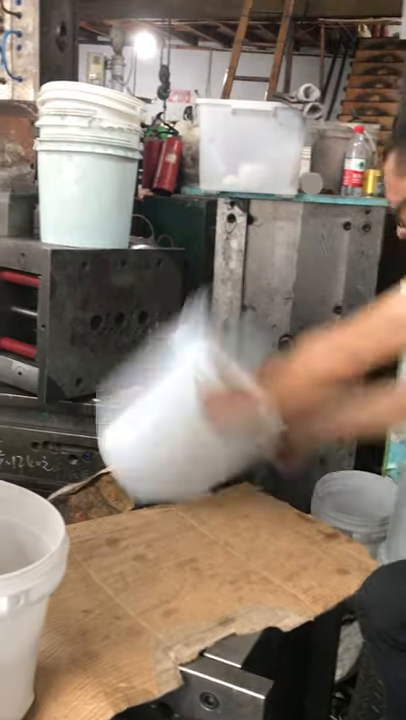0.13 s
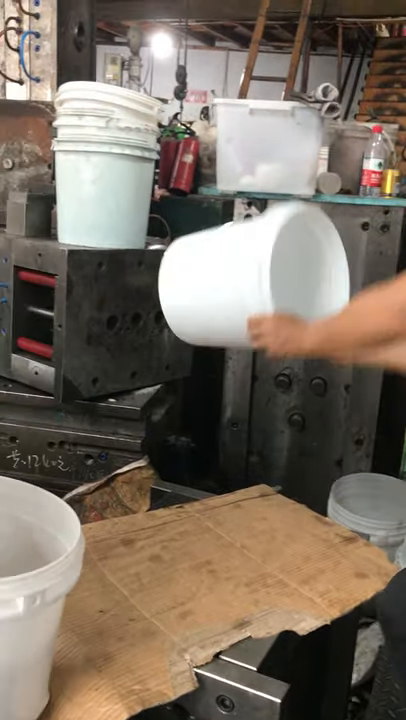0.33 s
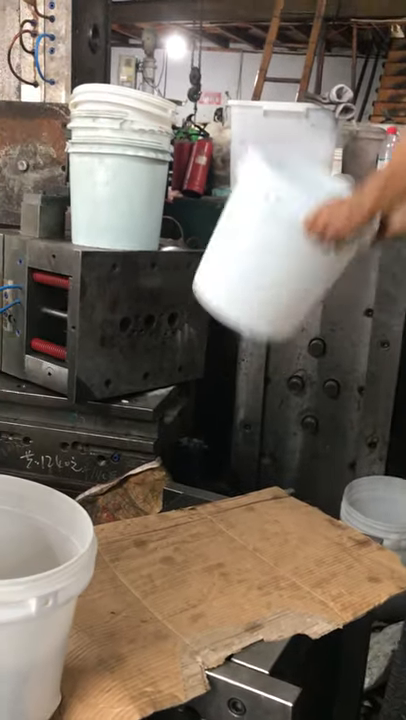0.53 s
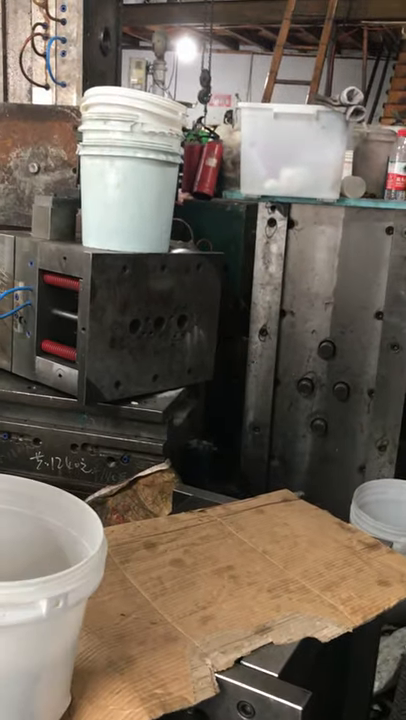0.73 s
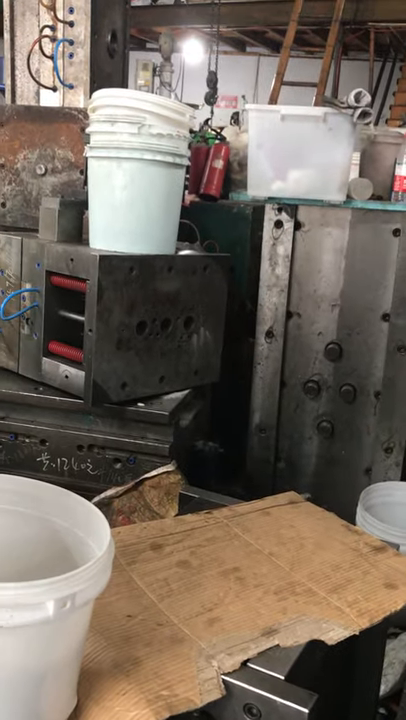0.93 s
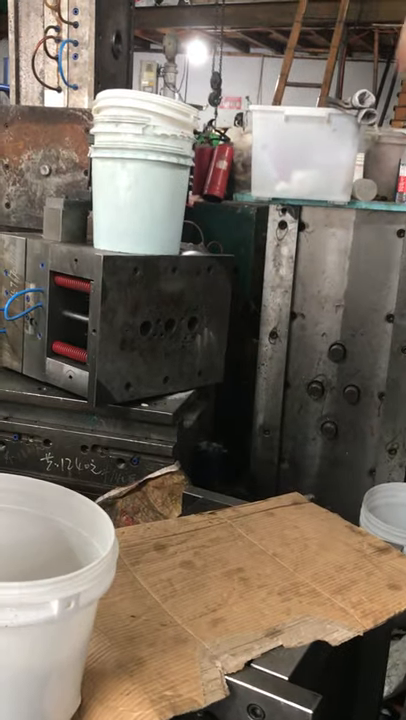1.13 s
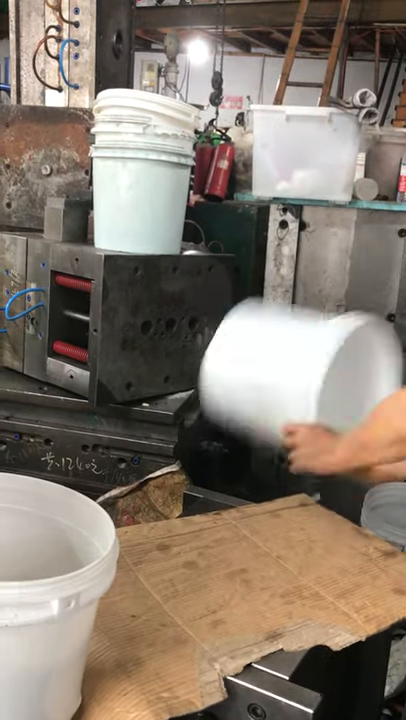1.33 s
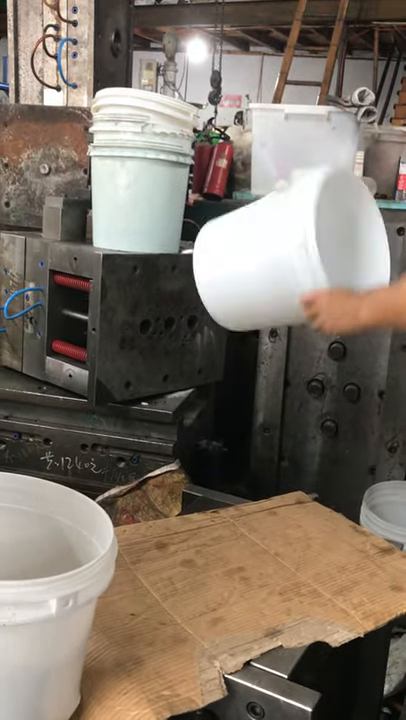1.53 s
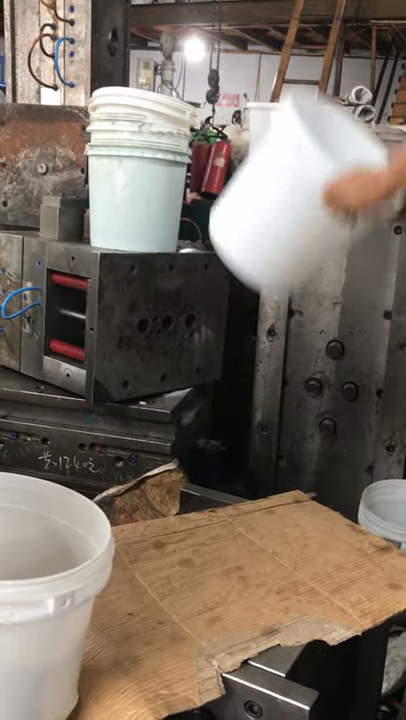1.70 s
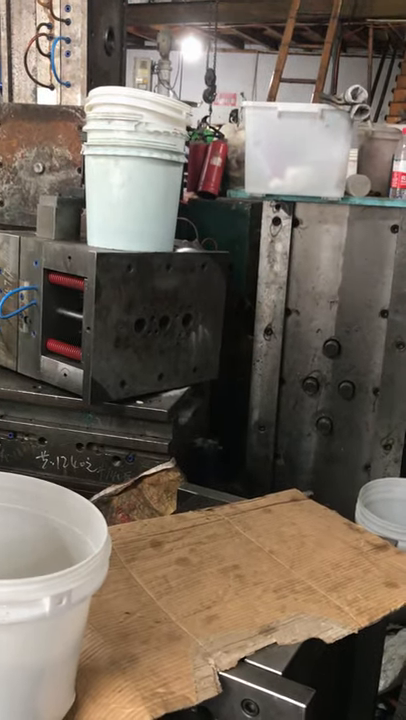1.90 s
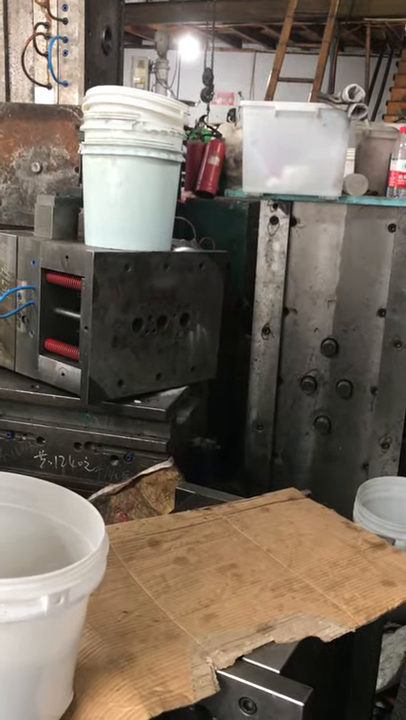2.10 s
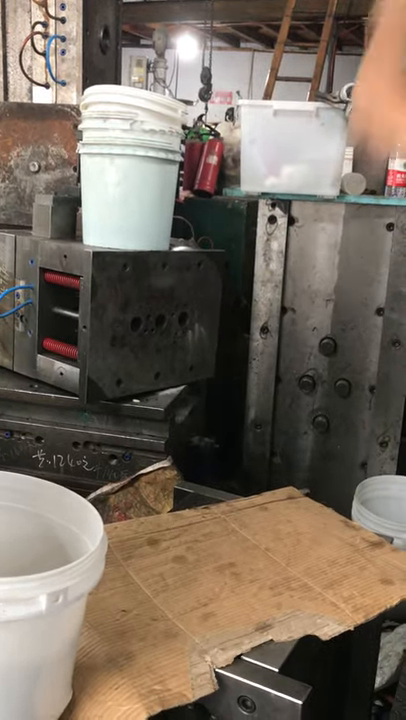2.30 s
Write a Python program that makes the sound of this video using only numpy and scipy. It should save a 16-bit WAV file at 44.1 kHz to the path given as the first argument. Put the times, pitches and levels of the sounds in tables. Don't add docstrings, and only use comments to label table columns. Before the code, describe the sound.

A hollow plastic bucket slams on a hard surface at 0.25 s, with a bright crack, short wall rattle, low boom and rebound at 0.3 s. A light handle tick and air puffs on the microphone lead to a second slam at 1.39 s, rebounding at 1.46 s. The large workshop echoes; motor hum and whine dip after each hit, then creep back, with faint metal clinks near 2.1 s.

```python
import sys
import numpy as np
from scipy import signal
from scipy.io import wavfile
from scipy.ndimage import uniform_filter1d, minimum_filter1d

SR = 44100
rng = np.random.default_rng(int(sys.argv[2]) if len(sys.argv) > 2 else 0)


def invert_db(level):
    return 10 ** (np.asarray(level, dtype=float) / 20)


def unload_wav(signal):
    wavfile.write(
        sys.argv[1],
        SR,
        np.round(np.clip(np.atleast_2d(signal).T, -1, 1) * 32767).astype(np.int16),
    )


N = 103635

# pitch_hz, level_db (per Hz)
WASH_SPECTRUM = [(15, -37), (25, 4.5), (263, -2), (293, 0.5), (427, -8), (575, -6), (1290, -12.5),
                 (4490, -24.5), (16000, -33.5)]
# pitch_hz, level_db, width_hz
MOTOR_TONES = [(134.3, -53.5, 4.3), (294.3, -36.5, 4), (591.5, -36, 37), (1000, -45.5, 8.2),
               (1447, -73, 2.7), (2154, -51.5, 12), (2400, -51, 180), (3133, -53, 62), (3623, -54, 16),
               (3886, -53.5, 12), (4370, -52.5, 19), (8200, -64, 11), (8900, -77, 40)]
# start_s, pitch_hz, level_db, t60_s (time to fade by 60 dB)
CLINKS = [(0.130, 6900, -40, .04), (0.608, 6250, -39, 0.086), (0.730, 2330, -34, 0.19),
          (1.280, 2276, -38.5, 0.55), (2.065, 8600, -41, .05), (2.120, 3440, -33.5, 0.11),
          (2.170, 3435, -37, 0.27), (2.215, 4900, -41, 0.08), (2.295, 3130, -39, 0.11)]
# middle_s, level_db, length_s
TICKS = [(0.032, -42, 0.0051), (0.136, -42, 0.0069), (1.086, -45, 0.014), (1.22, -45, .005),
         (1.331, -40, 0.0039), (2.050, -48, .004)]
# middle_s, level_db, pitch_hz, length_s
PUFFS = [(1.268, -22, 70, .009), (1.297, -17, 85, .011), (1.296, -24, 330, .006), (1.312, -25, 60, .01),
         (1.331, -18, 150, .009), (1.365, -29, 120, .015), (0.240, -28, 300, .008)]
# start_s, duck_db (how far the microphone gain drops)
SLAMS = [
    (0.2492, -11.5),
    (1.389, -12),
]
# pitch_hz, level_db (per Hz)
HALL_SPECTRUM = [(24, -55), (40, -34), (140, -5.5), (243, -26), (392, -14.5), (790, -13), (1210, -19),
                 (8340, -41), (16000, -46.5)]
# pitch_hz, t60_s
EARLY_FADE = [(60, 0.17), (240, 0.51), (1000, 0.37), (4000, 0.21), (12000, 0.33)]
LATE_FADE = [(60, 0.32), (240, 0.56), (600, 1.3), (1100, 2.66), (1600, 1.7), (4000, 0.95), (12000, 0.59)]
# start_s, level_db, attack_s, hold_s, pitch_hz
BOOMS = [
    (0.25, 3, 0.021, 0.015, 230.6),
    (0.29, 5, 0.014, 0.022, 243),
    (1.395, 4.5, 0.023, 0.013, 235.5),
    (1.455, 0.5, .005, .004, 240),
    (1.464, 5, 0.011, 0.0089, 238.2),
]
# start_s, level_db, softness_cut_hz, low_modes_extra_db
CONTACTS = [
    (0.2473, 4, 2460, -16),
    (0.2970, -3.5, 990, -18),
    (0.3330, -19, 1500, -6),
    (1.3840, -22.5, 450, 10),
    (1.3894, 4, 2570, 2.5),
    (1.4560, -6.5, 900, 1.5),
]
WALL_PITCHES = [355, 420, 490, 555, 630, 697, 790, 945, 1062, 1260, 1500, 1780, 1900, 2500]
# level_db, t60_s
WALL_MODES = [(-8, 0.075), (-8, 0.13), (-2, 0.22), (-15, 0.22), (-21.5, 0.2), (-9, 0.13), (-31, 0.28),
              (-10.5, 0.097), (-12.5, .13), (-15, 0.063), (3.5, 0.019), (-3, 0.017), (-17, 0.1), (-3, .05)]
# pitch_hz, level_db, t60_s
RIM_MODES = [(2700, -13, .004), (3900, -8, .004), (5600, -2, .0025), (7000, -7, .002), (8400, -3, .002),
             (11500, -9, .001), (13800, -4, .001)]
# start_s, level_db
SNAPS = [(0.24715, 12), (0.25015, 8), (0.2597, -8), (1.38990, 9), (1.39035, 9), (1.39265, 8), (1.3990, -11)]


def rms_one(x):
    return x / np.sqrt(np.mean(x ** 2) + 1e-20)


def at_hz(points, hz):
    pitch, value = np.array(points).T
    return np.interp(np.log(hz), np.log(pitch), value)


def since(s):
    return np.maximum(np.arange(N) / SR - s, 0)


def dying(s, t60):
    return (since(s) > 0) * invert_db(-60 * since(s) / t60)


def drift(rate_hz):
    r = np.exp(-2 * np.pi * rate_hz * 40 / SR)
    chance = rng.standard_normal(N // 40 + 2002)
    slow = signal.lfilter([1], [1, -2 * r, r * r], chance)[2000:]
    return np.interp(np.arange(N) / 40, np.arange(len(slow)), rms_one(slow - slow.mean()))


def ring(push, hz, t60):
    r, w = invert_db(-60 / (t60 * SR)), 2 * np.pi * hz / SR
    return signal.lfilter([0, np.sin(w)], [1, -2 * r * np.cos(w), r * r], push + 1e-18)


def narrow_noise(hz, width_hz):
    return rms_one(ring(rng.standard_normal(N), hz, np.log(1000) / (np.pi * width_hz)))


def high_passed(x, order, cut_hz):
    return signal.sosfilt(signal.butter(order, cut_hz, "high", fs=SR, output="sos"), x)


def bands(spectrum):
    edges = 25 * 2 ** np.arange(0, 9.5, 1 / 3)
    middles = np.sqrt(edges[1:] * edges[:-1])
    white = rng.standard_normal((2, N))
    parts = []
    for k, hz in enumerate(middles):
        band = signal.butter(2, edges[k:k + 2], "band", fs=SR, output="sos")
        parts.append(invert_db(at_hz(spectrum, hz)) * signal.sosfilt(band, white[k % 2]))
    parts = np.array(parts)
    return zip(middles, parts / np.sqrt(np.mean(parts.sum(0) ** 2)))


def click(s, db):
    return invert_db(db) * (np.arange(N) == int(s * SR))


def machinery():
    lumps = drift(5)
    wash = 0
    for hz, noise in bands(WASH_SPECTRUM):
        patchy_db = (hz < 3000) * 2.6 * drift(3.3)
        lumpy_db = (hz < 200) * 1.6 * lumps
        wash = wash + noise * invert_db(patchy_db + lumpy_db)
    tones = 0
    for hz, db, width_hz in MOTOR_TONES:
        tones = tones + invert_db(db + 1.2 * drift(3.8)) * narrow_noise(hz, width_hz)
    return invert_db(-31) * wash + tones


def clinks():
    out = 0
    for s, hz, db, t60 in CLINKS:
        fade = uniform_filter1d(np.abs(dying(s, t60)), size=120)
        out = out + fade * invert_db(db) * np.sin(2 * np.pi * hz * since(s))
    return out


def ticks():
    bright = high_passed(rng.standard_normal(N), 2, 5000)
    t = np.arange(N) / SR
    return bright * sum(invert_db(db) * np.exp(-((t - s) / length) ** 2) for s, db, length in TICKS)


def puffs():
    rough = narrow_noise(210, 370)
    out = 0
    for s, db, hz, length in PUFFS:
        t = np.arange(N) / SR - s
        shape = invert_db(db) * np.exp(-(t / length) ** 2)
        out = out + shape * (0.23 * rough + np.sin(2 * np.pi * hz * t * (1 - 35 * t)))
    return out


def hall():
    def after_slams(t60):
        return sum(dying(s + 0.00067, t60) for s, _ in SLAMS)

    def swell(t60):
        return 1 - sum(dying(s, t60) for s, _ in SLAMS)

    echo = 0
    for hz, noise in bands(HALL_SPECTRUM):
        early = invert_db(-6 * (150 < hz < 320)) * after_slams(at_hz(EARLY_FADE, hz))
        late = invert_db(-11) * after_slams(at_hz(LATE_FADE, hz))
        echo = echo + noise * (early + late)
    echo = invert_db(-9) * swell(0.013) * echo

    steel = invert_db(-27) * after_slams(1.65) * narrow_noise(1102, 62)

    boom_hz, width_hz = 240, 29
    tail = narrow_noise(boom_hz, width_hz)
    tail = tail + invert_db(-4) * np.sin(2 * np.pi * boom_hz * np.arange(N) / SR)
    tail = tail + 0.67 * narrow_noise(1.16 * boom_hz, width_hz)
    tail = invert_db(-16.5) * swell(0.096) * after_slams(1.725) * tail
    return steel + echo + tail


def booms():
    release_s, glide = 0.0062, -0.18
    out = 0
    for s, db, attack, hold, hz in BOOMS:
        t = since(s)
        rise = np.sin(np.pi / 2 * np.minimum(t / attack, 1)) ** 2
        choke = np.exp(-since(s + attack + hold) / release_s)
        out = out + invert_db(db) * rise * choke * np.sin(2 * np.pi * hz * (t + glide * t * t))
    return out


def walls():
    chance_db = rng.normal(0, 1.1, (len(CONTACTS), len(WALL_MODES)))
    out = 0
    for (s, db, cut_hz, low_db), own_db in zip(CONTACTS, chance_db):
        hits = click(s, db) + click(s + 0.003, db - 3)
        push = signal.lfilter(*signal.butter(2, cut_hz, fs=SR), hits)
        for k, (hz, (mode_db, t60)) in enumerate(zip(WALL_PITCHES, WALL_MODES)):
            level_db = mode_db + own_db[k] + low_db * (400 < hz < 600)
            side = (-1) ** (k // 4)
            out = out + side * invert_db(level_db) * ring(push, hz, t60)
    return out


def cracks():
    snaps = sum(click(s, db) for s, db in SNAPS)
    fade = sum(invert_db(db) * dying(s, 0.03) for s, db in SNAPS)
    splash = invert_db(-30) * fade * high_passed(rng.standard_normal(N), 2, 2500)
    rim = sum(invert_db(db) * ring(snaps, hz, t60) for hz, db, t60 in RIM_MODES)
    return splash - rim


def scene():
    background = machinery() + clinks() + ticks() + puffs()
    bucket = hall() + booms() + walls() + cracks()
    return (background + bucket)[None]


def top_cut(x):
    return signal.sosfilt(signal.butter(12, 16670, fs=SR, output="sos"), x)


def record(dry):
    duck_s, hold_s, recover_db_per_s = 0.05, 0.44, 22
    gain_db = 0
    for s, depth_db in SLAMS:
        drop_db = depth_db * (1 - np.exp(-since(s) / duck_s))
        gain_db = gain_db + np.minimum(drop_db + recover_db_per_s * since(s + hold_s), 0)
    x = high_passed(dry, 3, 44) * invert_db(gain_db)

    dip_hz, dip_width_hz = 10520, 400
    x = x - 0.42 * signal.lfilter(*signal.iirpeak(dip_hz, dip_hz / dip_width_hz, fs=SR), x)

    ceiling, look_s = 0.7, 0.003
    size = int(look_s * SR)
    limit = minimum_filter1d(np.minimum(1, ceiling / (np.abs(x) + 1e-9)), size=size)
    x = x * uniform_filter1d(limit, size=size)
    return top_cut(signal.sosfilt(signal.cheby2(12, 60, 16900, fs=SR, output="sos"), x))


dry = scene()
out = record(dry)
unload_wav(out)
```